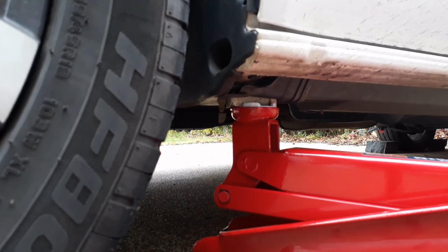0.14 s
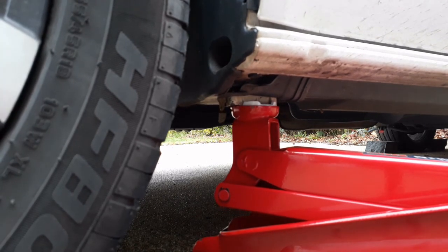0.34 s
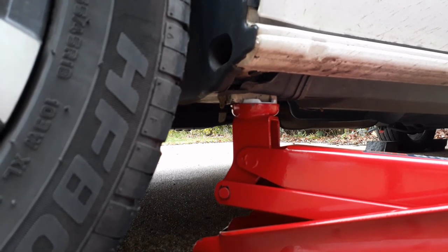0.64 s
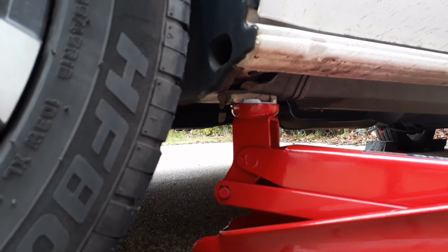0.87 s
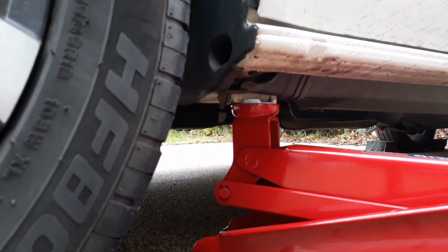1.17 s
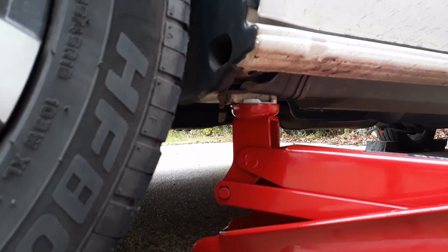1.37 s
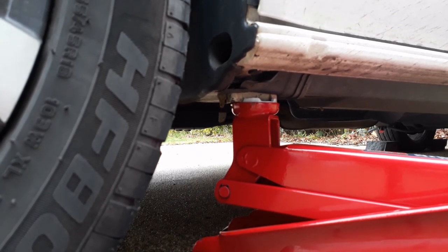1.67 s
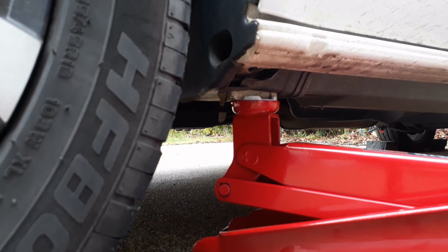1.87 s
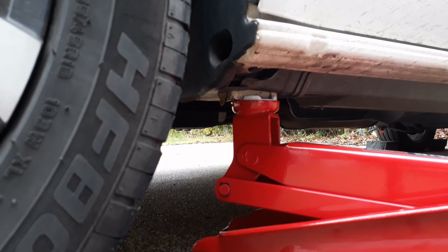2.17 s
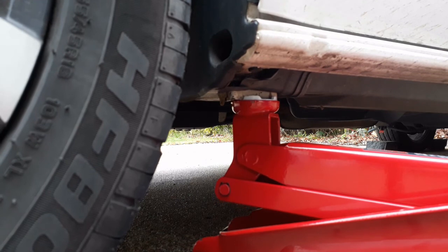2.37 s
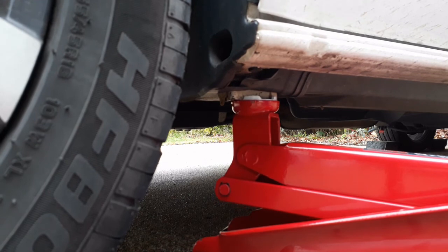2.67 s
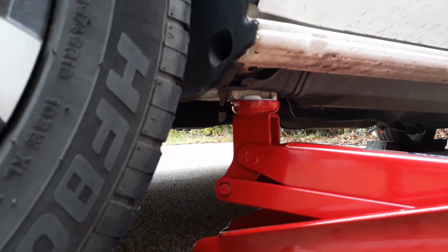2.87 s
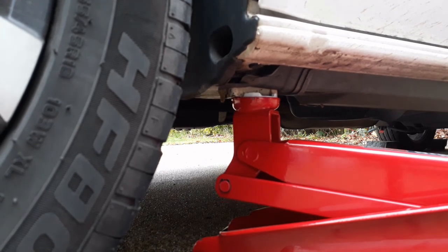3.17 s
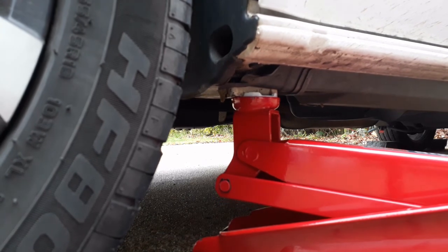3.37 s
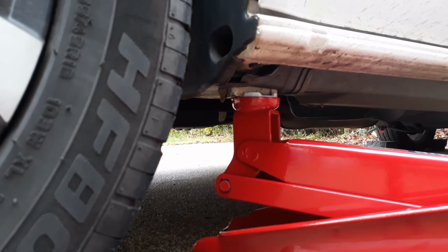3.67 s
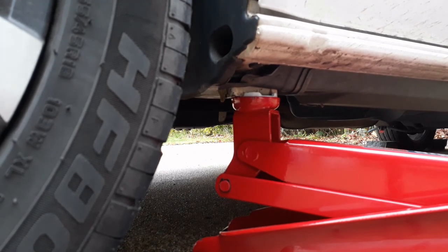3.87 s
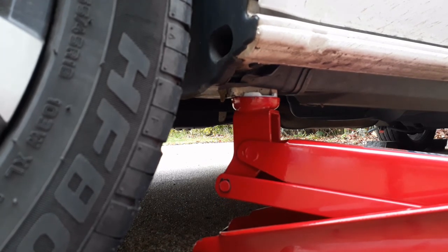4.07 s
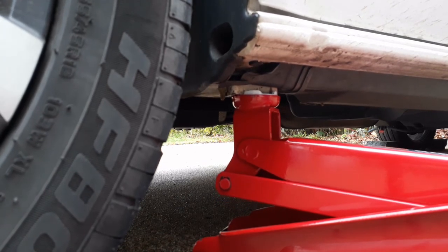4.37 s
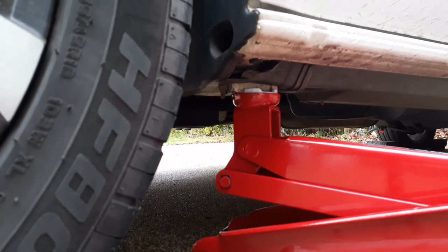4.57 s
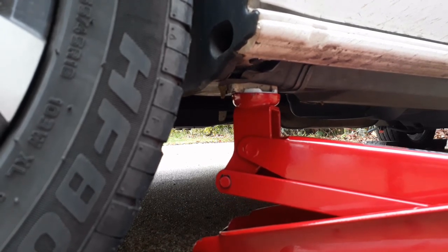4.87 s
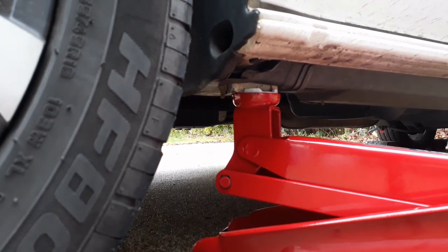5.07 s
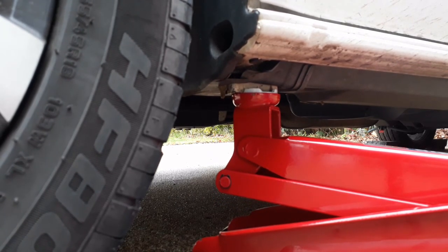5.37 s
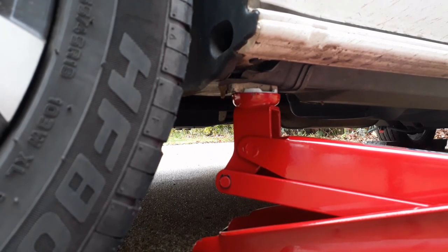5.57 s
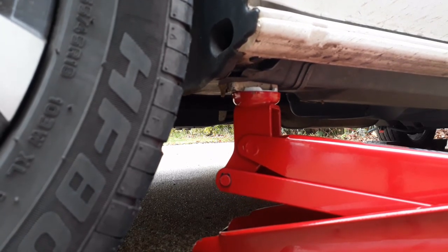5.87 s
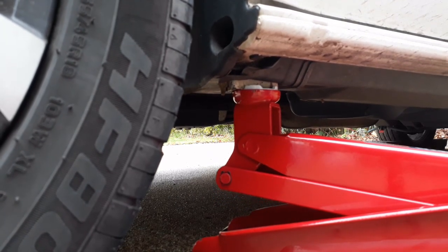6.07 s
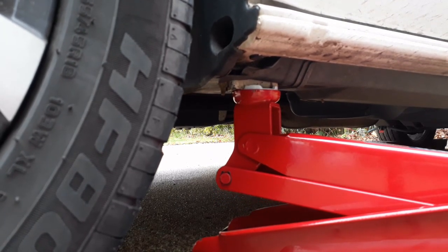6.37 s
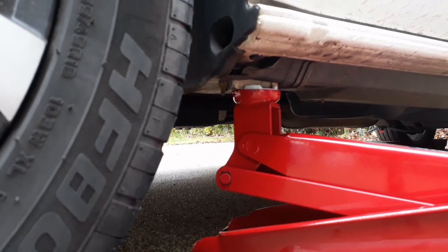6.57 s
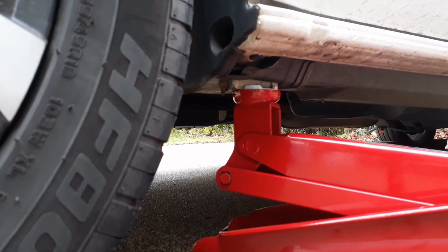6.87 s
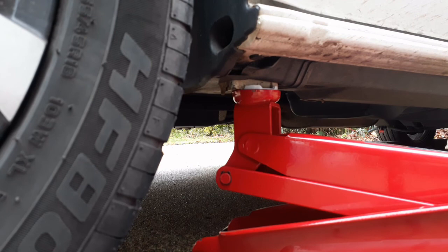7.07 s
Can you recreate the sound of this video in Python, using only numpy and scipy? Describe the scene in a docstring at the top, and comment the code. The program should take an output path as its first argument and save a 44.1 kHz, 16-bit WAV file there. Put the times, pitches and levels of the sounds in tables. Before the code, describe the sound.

A close stereo microphone near the ground picks up a metal car jack working. Loud bright clacks and weighty clunks come about every one and a third seconds, five in all. Between them are dull knocks, dry scrapes, faint squeaks of the piston seal and a low metallic hum. The car's underside adds a faint short tail; the outdoor surroundings are nearly silent, with light wind buffeting the microphone.

```python
"""Floor jack under a car, close

Outdoors, close by: a camera on the ground hears a steel floor jack pumped five times under a car.
Struck modes make the linkage knocks and frame ring; noise bursts make the handle's clicks and clunks.
Swelling noise is the piston's rub and the pivots' scrapes; lumpy noise is light wind on the microphone ports.
The car's underside returns a faint tail, over still outdoor air."""
import sys
import numpy as np
from scipy import signal
from scipy.fft import rfft, irfft, next_fast_len
from scipy.io import wavfile
from scipy.ndimage import uniform_filter1d, map_coordinates

SR = 44100
rng = np.random.default_rng(int(sys.argv[2]) if len(sys.argv) > 2 else 0)


def master_out(mix):
    """Clip the mix to full scale and print it as 16-bit PCM to the path in sys.argv[1]."""
    frames = np.transpose(np.atleast_2d(mix))
    ceiling = np.clip(frames, -1, 1)
    pcm = np.round(ceiling * 32767).astype(np.int16)
    wavfile.write(sys.argv[1], SR, pcm)


N = 318402
TIME = np.arange(N) / SR  # s

# Event levels are relative: each source adds its own trims.
# gusts at the ports: start_s (centre), level_db, half_length_s, left_minus_right_db
GUSTS = [(0.003, -50.5, 0.25, 6.5), (0.776, -66, 1, 5), (1.5, -61, 0.29, 9.5), (6.912, -48, 0.42, -3)]
# eddies hitting the right port: start_s (centre), level_db, pitch_hz
EDDIES = [(6.749, -30, 119), (7.048, -17.5, 123)]
# each shake sets the arm's hum anew: start_s, lower_mode_db, upper_mode_db
SHAKES = [(0, -53.5, -65), (0.93, -62.5, -65), (1.43, -65, -66.5), (2.23, -56, -65), (2.74, -60, -55),
          (3.808, -50.5, -57), (4.05, -51.5, -57.5), (4.93, -59, -61), (5.46, -59, -59), (6.44, -55.5, -75),
          (6.97, -41.5, -66)]
# humming modes of the lifting arm: pitch_hz, t60_s, waver_db
ARM_MODES = [(322.8, 1.65, 3), (403, 1.74, 3.5)]
# dull booms at the arm's lowest mode: start_s, level_db
BOOMS = [(3.809, -54.5), (5.457, -53.5), (6.712, -39), (6.969, -40.5)]
# the steel sings faintly after the first two landings: start_s, level_db
SINGS = [(1.426, -71), (2.733, -69)]
# modes of that singing: pitch_hz, level_db, t60_s
SINGING_MODES = [(810, 2, 1.2), (845, 2, 1.26), (1490, -4, 1.45), (2164, -6, 0.7)]
# the piston is pushed home: start_s (fastest point), level_db
STROKES = [(0.22, -65.5), (1.33, -69), (2.46, -69.5), (3.95, -68.5), (6.86, -69)]
# faint squeaks of the piston seal: start_s (centre), level_db, half_length_s, pitch_hz
SQUEAKS = [(0.851, -64, 0.045, 2160), (0.875, -57.5, 0.061, 2800), (1.965, -77.5, 0.2, 3070),
           (2.208, -62, 0.017, 1625), (2.392, -58, 0.017, 1380), (3.788, -61.5, 0.018, 1360),
           (6.335, -63, 0.032, 3030)]
# hollow knocks as the stroke turns: start_s, level_db, upper_modes_db
KNOCKS = [(0.615, -41, -8), (0.761, -49.5, -28), (2.048, -47, -24), (2.475, -48.5, -44),
          (3.295, -47.5, -12.5), (3.365, -46, -39), (4.618, -43.5, -7.5), (4.799, -53.5, -35),
          (6.223, -56.5, -18)]
# modes of the linkage: pitch_hz, level_db, t60_s
LINKAGE_MODES = [(468.4, 0, 0.13), (513, 0, 0.14), (560, -3.5, 0.25), (656, 15, 0.045), (1059, 16, 0.078),
                 (1160, 24.5, 0.028), (1520, -1.5, 0.14), (1655, 3.5, 0.12), (2400, 3, 0.06)]
# the frame takes up the load: start_s, clatter_db, thump_db
THUDS = [(0.8085, -44.5, -67), (0.9329, -65, -55.5), (1.193, -39.5, -46.5), (2.1187, -44.5, -64.5),
         (2.654, -34.5, -42.5), (3.805, -43, -45), (6.7035, -39.5, -50.5)]
# short scrapes of the pivots: start_s, scrape_db, thump_db, strongest_resonance_hz
SCRAPES = [(0.9078, -41, -51, 4080), (1.117, -52.5, -78, 6700), (2.2233, -41.5, -53.5, 3560),
           (2.404, -50, -78, 7300), (3.543, -47.5, -54, 2190), (3.709, -47, -61.5, 4440),
           (4.922, -50.5, -55, 7700), (5.1025, -54.5, -72, 6400), (6.4172, -48, -61, 5800),
           (6.4373, -42.5, -58, 4620), (6.6305, -54, -95, 6740)]
# the handle clicks in its socket: start_s, clatter_db, tick_db, strongest_resonance_hz
CLICKS = [(1.2583, -40.5, -56, 3370), (1.2751, -30, -36.5, 3030), (1.304, -34.5, -45, 2200),
          (1.351, -37, -54, 3070), (1.3696, -35, -26.5, 4360), (1.3747, -18, -45, 3870),
          (2.364, -31.5, -54, 1930), (2.575, -35, -37.5, 2020), (2.604, -36.5, -62, 2290),
          (2.633, -34.5, -60, 2400), (2.6482, -30, -49, 1860), (2.6678, -23.5, -27.5, 2100),
          (3.963, -44, -75, 3400), (3.9841, -28, -31.5, 3670), (5.294, -37.5, -40, 4640),
          (5.333, -27, -38, 3340), (5.39, -27, -32, 5900), (6.7966, -30.5, -33, 3010),
          (6.8239, -33, -49, 2500), (6.872, -33, -52, 3870), (6.8917, -24.5, -25, 3380),
          (6.902, -23.5, -53, 2030)]
# the handle lands on its stop, then rebounds and seats with its whole weight:
# start_s, clatter_db, tick_db, thump_db, strongest_resonance_hz
LANDINGS = [(1.4168, -29.5, -40, -44.5, 5070), (1.4258, -25, -62, -38, 1454),
            (2.6825, -34, -60, -40.5, 1910), (2.696, -32.5, -68, -37.5, 1680),
            (2.732, -23.5, -44, -38.5, 2270), (2.742, -38, -62, -33, 1290), (4.03, -23.5, -50, -43.5, 2740),
            (4.046, -28, -55, -32, 4700), (5.45, -27, -35, -41, 4960), (5.4618, -22.5, -49, -36.5, 2180),
            (6.9516, -25, -62, -41.5, 2600), (6.974, -33.5, -69, -33, 1510)]
# dry snaps of the saddle under the car: start_s, level_db
SNAPS = [(1.7613, -46), (6.5384, -53.5)]

# modes of the frame and lifting arm: pitch_hz, level_db, t60_s
FRAME_MODES = [(341, 7, 0.12), (367.8, 3, 0.17), (436.2, 0.5, 0.23), (475, 4.5, 0.16), (691.6, 2, 0.14),
               (846, -2.5, 0.15), (1124, -2.5, 0.16), (1448, 11, 0.05), (1583, -5, 0.16)]
# resonances of the handle: pitch_hz, width_hz, level_db
HANDLE_PEAKS = [(2080, 21, 10), (3650, 20, 23), (4150, 165, 19), (4700, 200, 14), (5920, 110, 15),
                (6990, 64, 17.5), (7640, 166, 23), (10490, 130, 17.5), (10800, 86, 8.5)]

# spectra of the noises: pitch_hz, level_db (per Hz)
WIND_COLOUR = [(20, -42), (55, 0), (120, 1.5), (260, -9.5), (400, -14.5), (900, -26), (3000, -41.5)]
AIR_COLOUR = [(20, -15), (60, 0), (120, 5), (220, -11), (380, -0.5), (600, -10.5), (1300, -12.5),
              (6000, -28), (8600, -24), (12500, -20.5), (16000, -22)]
RUB_COLOUR = [(600, 6), (1500, 6), (4000, 8), (7000, 7), (9000, -6), (11500, 4.5), (16000, -35)]
SEAL_COLOUR = [(1200, -13.5), (2200, -13), (3300, -24), (5000, -22.5)]
THUD_COLOUR = [(500, 1), (900, 14.5), (2200, 8), (4500, -14), (12000, -75)]
THUMP_COLOUR = [(40, -27), (150, 3.5), (240, -12.5), (340, 6.5), (490, 8.5), (650, -4), (1400, -32.5)]
TICK_COLOUR = [(5000, -8), (7800, -2.5), (10500, 12.5), (16000, -3)]
SCRAPE_COLOUR = [(500, 9), (900, 17.5), (1700, 11), (4200, 3.5), (7000, 2.5), (12000, -32)]
CLICK_COLOUR = [(500, -35), (1000, 6.5), (1600, 4.5), (3500, 7), (5500, 6.5), (7500, -0.5), (12000, -38)]
CLUNK_COLOUR = [(500, -4.5), (950, 6), (1600, 5), (2600, 0), (4200, -3.5), (6500, -6.5), (12000, -60)]
SNAP_COLOUR = [(1500, -16), (3300, 1), (7500, -7), (10000, -24)]

# left-right likeness of the noises: pitch_hz, likeness (0-1)
LIKENESS = [(100, .7), (400, .85), (1500, .55), (5000, .55), (8000, .8)]
# decay of the tail from the underside and surroundings: pitch_hz, t60_s
UNDERSIDE_DECAY = [(150, 0.67), (500, 0.75), (2000, 0.37), (6000, 0.41), (14000, 0.2)]

CALM_DB = -97  # the breeze between gusts
BOOM_HZ, BOOM_T60_S = 169.1, 0.52
PUSH_DB_PER_S, EASE_DB_PER_S, REST_RUB_DB = 7.5, 36, -75  # the rub swells, dies away, never quite stops
SQUEAK_WIDTH_HZ, SQUEAK_PEAK_DB = 220, 19
BREAKAWAY_DB = -5.5  # hiss that comes with each squeak, relative to it
REBOUND_S, REBOUND_DB, REBOUND_BRIGHT_DB = 0.04, -21, -4  # a softer, duller knock follows each knock
THUD_TICK_DB, THUD_HZ = -44, 1950  # tick relative to the clatter; strongest resonance
SCRAPE_WIDTH_HZ, SCRAPE_PEAK_DB = 760, 17  # how far the strongest resonance stands out
SCRAPE_HISS_DB = -66.5  # fine hiss with every scrape
LEAD_IN_S, LEAD_IN_DB = 0.013, -24.5  # soft noise ahead of each click and landing, under its clatter
FIRM_DB, HEAVIEST_DB, SLACK_DB_PER_S = -10.5, -36, 61  # click thump: under clatter, cap, loss by slack left
PING_DB, PING_T60_S = -16, 0.07  # each contact rings its own resonance
PLATE_SCATTER_DB = 3.5
CHATTER_DB, CHATTER_PER_S = 3, 600  # depth and pace of the chatter within a blow
TOP_HZ = 16100


def amp(db):
    """Decibels to gain."""
    return 10 ** (np.asarray(db) / 20)


def unit(x):
    """Scale to rms 1."""
    return x / np.sqrt(np.mean(x ** 2) + 1e-20)


def along(points, hz):
    """Read (pitch_hz, value) points on a log frequency axis."""
    f, value = np.transpose(points)
    return np.interp(np.log(hz + 1), np.log(f + 1), value)


def wobble(rate):
    """A smooth random curve with rate knots a second."""
    knots = rng.standard_normal(int(N * rate / SR) + 4)
    return map_coordinates(knots, [TIME * rate])


def swell(s, half):
    """A bell-shaped rise and fall around time s."""
    return np.exp(-((TIME - s) / half) ** 2)


def filtered(x, response):
    """Shape x by a response of frequency."""
    n = x.shape[-1]
    m = next_fast_len(n + 8192)
    return irfft(rfft(x, m) * response(np.fft.rfftfreq(m, 1 / SR)), m)[..., :n]


def add(track, s, sound):
    """Mix a stereo sound into the track at time s."""
    part = track[:, max(round(s * SR), 0):][:, :sound.shape[-1]]
    part += sound[..., :part.shape[-1]]


def noise(colour, size, peaks=()):
    """Stereo noise of rms 1 with a spectrum and resonances, less alike in the middle range."""
    def response(hz):
        resonances = sum(amp(db) ** 2 / (1 + (2 * (hz - f) / w) ** 2) for f, w, db in peaks)
        gain = amp(along(colour, hz)) * np.sqrt(1 + resonances)
        turn = np.arccos(np.clip(along(LIKENESS, hz), -1, 1)) / 2
        return gain * np.array([np.cos(turn), np.sin(turn)])  # shares of mid and side
    mid, side = filtered(rng.standard_normal((2, size)), response)
    return unit(np.array([mid + side, mid - side]))


def burst(colour, rise, t60, peaks=(), crack=0, patchy_db=5):
    """Crowded modes swell and die together, led by a brief crack; each contact favours other modes."""
    t = np.arange(SR // 3) / SR
    decay = amp(-60 * t / t60) + crack * amp(-60 * t / 0.024)
    shape = (1 - np.exp(-(t / rise) ** 2)) * decay
    shape /= shape.max()
    knots = np.arange(0, SR / 2, 230)  # Hz
    favour = patchy_db * np.clip(rng.standard_normal(len(knots)), -2, 1.5)
    modes = filtered(noise(colour, len(t), peaks), lambda hz: amp(np.interp(hz, knots, favour)))
    top = filtered(modes, lambda hz: 1 - 1 / (1 + (hz / 6500) ** 6))
    damped = modes - top * (1 - amp(-60 * t / 0.17))  # the highest modes die first
    return unit(damped * shape) * np.sqrt(np.mean(shape ** 2))


def ring(modes, rise, scatter_db):
    """Separate modes, struck with new strengths and phases, decay as sines."""
    t = np.arange(SR * 3 // 2) / SR
    out = np.zeros((2, len(t)))
    for hz, db, t60 in modes:
        u = t[:int(t60 * SR)]
        spread = rng.standard_normal((2, 1)) * min(hz / 1500, 1)  # the ports differ more at high pitch
        phase = rng.uniform(0, 2 * np.pi) + spread
        level = amp(db + scatter_db * rng.standard_normal() - 60 * u / t60)
        out[:, :len(u)] += level * np.sin(2 * np.pi * hz * u + phase)
    return out * (1 - np.exp(-(t / rise) ** 2))


def chatter(x):
    """Loose steel touches many times within one blow, breaking its decay into uneven ticks."""
    knots = np.arange(x.shape[-1]) * CHATTER_PER_S / SR
    count = int(knots[-1]) + 2
    touches = rng.exponential(size=count).clip(0, np.pi)
    gain = amp(CHATTER_DB * np.interp(knots, np.arange(count), touches))
    return x * unit(gain)


def blows(rows, plates, colour, rise, t60, tick_t60, crack, clatter_db, plates_db, tick_db,
          thump_db, frame_db, favour_db, reach=10, tick_peaks=()):
    """Steel meets steel: the handle clatters at once, the heavy frame answers more slowly."""
    out = np.zeros((2, N))
    for s, clatter, tick, thump, hz in rows:
        favoured = (hz, 0.52 * hz, favour_db)  # the point of contact brings out one resonance
        clash = chatter(burst(colour, rise, t60, [*HANDLE_PEAKS, favoured], crack))
        # little is stirred far above that resonance
        clash = filtered(clash, lambda f: 1 / np.sqrt(1 + (f / (reach * hz)) ** 4))
        ping = ring([(hz, 0, PING_T60_S)], rise=0.00054, scatter_db=2)
        plate_ring = ring(plates, rise=0.0026, scatter_db=PLATE_SCATTER_DB)
        high_tick = burst(TICK_COLOUR, rise, tick_t60, tick_peaks, crack)
        low_thump = burst(THUMP_COLOUR, rise=0.0022, t60=0.28)
        frame_ring = ring(FRAME_MODES, rise=0.013, scatter_db=2)
        add(out, s, amp(clatter + clatter_db) * clash)
        add(out, s, amp(clatter + PING_DB) * ping)
        add(out, s, amp(clatter + plates_db) * plate_ring)
        add(out, s, amp(tick + tick_db) * high_tick)
        add(out, s, amp(thump + thump_db) * low_thump)
        add(out, s, amp(thump + frame_db) * frame_ring)
    return out


def side_plates(count):
    """The side plates' many short partials, one set for all blows: pitch_hz, level_db, t60_s."""
    hz = np.linspace(1300, 6300, count) + rng.uniform(-62.5, 38.0, count)
    level_db = -4 * np.log2(hz / hz[0])
    return np.column_stack([hz, level_db, rng.uniform(.06, .19, count)])


def outdoor_air():
    """Still outdoor air: steady coloured noise whose level drifts slowly."""
    return amp(-70.0 + wobble(2.76)) * noise(AIR_COLOUR, size=N)


def wind():
    """Gusts of lumpy buffeting, different at each microphone port, with single eddies at the right."""
    lumps = amp(5 * np.array([wobble(24), wobble(24)]))
    buffets = lumps * rng.standard_normal((2, N))
    low_cut = lambda hz: 1 / (1 + (42 / (hz + 1)) ** 4)
    rumble = unit(filtered(buffets, lambda hz: amp(along(WIND_COLOUR, hz)) * low_cut(hz)))
    gusts = sum(amp([[db + pan / 2], [db - pan / 2]]) * swell(s, half) for s, db, half, pan in GUSTS)
    out = rumble * (amp(CALM_DB) + gusts)
    for s, db, hz in EDDIES:
        cycles = (TIME - s) * hz
        out[1] += amp(db) * np.sin(2 * np.pi * cycles) * np.exp(-(cycles / .8) ** 2)
    return out


def arm():
    """The arm's modes hum on from each shake; heavy blows add a low boom or a thin singing."""
    starts, *levels = np.transpose(SHAKES)
    last = np.maximum(np.searchsorted(starts, TIME) - 1, 0)  # the latest shake
    since = TIME - starts[last]
    out = np.zeros((2, N))
    for (hz, t60, waver_db), db in zip(ARM_MODES, levels):
        level = amp(db[last] - 60 * since / t60 + waver_db * wobble(20))
        smooth_level = uniform_filter1d(level, size=SR // 50)
        out += smooth_level * np.sin(2 * np.pi * hz * TIME + 0.53 * wobble(8.2))
    for s, db in BOOMS:
        add(out, s, amp(db) * ring([(BOOM_HZ, 0, BOOM_T60_S)], rise=0.01, scatter_db=1))
    for s, db in SINGS:
        add(out, s, amp(db) * ring(SINGING_MODES, rise=0.0089, scatter_db=6))
    return out


def piston():
    """A hiss that swells with each push and the seal's gritty squeak, both roughened by tiny slips."""
    slips = amp(1.1 * wobble(63) + wobble(570))
    pushes = [amp(db - np.maximum(PUSH_DB_PER_S * (s - TIME), EASE_DB_PER_S * (TIME - s)))
              for s, db in STROKES]
    rub = np.maximum(np.max(pushes, axis=0), amp(REST_RUB_DB))
    squeak = np.zeros((2, N))
    for s, db, half, hz in SQUEAKS:
        level = amp(db) * swell(s, half)
        rub += amp(BREAKAWAY_DB) * level
        grit = np.zeros((2, N))
        # one second of noise, centred on the squeak
        add(grit, s - .5, noise(SEAL_COLOUR, size=SR, peaks=[(hz, SQUEAK_WIDTH_HZ, SQUEAK_PEAK_DB)]))
        squeak += level * grit
    return slips * (rub * noise(RUB_COLOUR, size=N) + slips * squeak)


def linkage():
    """Hollow knocks and rebounds, each with its own share of upper modes; dull ones keep mostly the lowest."""
    out = np.zeros((2, N))
    rebounds = [(s + REBOUND_S, db + REBOUND_DB, bright_db + REBOUND_BRIGHT_DB)
                for s, db, bright_db in KNOCKS]
    lowest_hz = LINKAGE_MODES[0][0]
    for s, db, bright_db in KNOCKS + rebounds:
        modes = [(hz, level + bright_db * min(np.log2(hz / lowest_hz) * 2, 1.4), t60)
                 for hz, level, t60 in LINKAGE_MODES]
        add(out, s, amp(db) * ring(modes, rise=0.009, scatter_db=1.0))
        add(out, s, amp(db + bright_db - 5) * burst(THUD_COLOUR, rise=0.0042, t60=0.17))
        add(out, s, amp(db - 13) * burst(THUMP_COLOUR, rise=0.00045, t60=0.53))
    return out


def load_thuds(plates):
    """The frame takes up the load in softer blows that share one dull resonance."""
    rows = [(s, db, db + THUD_TICK_DB, thump, THUD_HZ) for s, db, thump in THUDS]
    return blows(rows, plates, THUD_COLOUR, rise=0.001, t60=0.25, tick_t60=0.15, crack=0.14,
                 clatter_db=-11.0, plates_db=-22.0, tick_db=-12, thump_db=0.5, frame_db=-2, favour_db=4)


def pivots():
    """Each scrape is a chattering, resonant burst with a fine hiss, and shakes the frame."""
    out = np.zeros((2, N))
    for s, scrape_db, thump_db, hz in SCRAPES:
        peaks = [*HANDLE_PEAKS, (hz, SCRAPE_WIDTH_HZ, SCRAPE_PEAK_DB)]
        scrape = chatter(burst(SCRAPE_COLOUR, rise=0.00064, t60=0.2, peaks=peaks))
        add(out, s, amp(scrape_db - 2.5) * scrape)
        add(out, s, amp(SCRAPE_HISS_DB) * burst(TICK_COLOUR, rise=0.0014, t60=0.59))
        add(out, s, amp(thump_db) * ring(FRAME_MODES, rise=0.017, scatter_db=6))
    return out


def lead_ins():
    """A faint soft noise swells just before each click and landing."""
    out = np.zeros((2, N))
    for s, db, *_ in [*CLICKS, *LANDINGS]:
        soft_noise = burst(SCRAPE_COLOUR, rise=0.015, t60=0.1, peaks=HANDLE_PEAKS)
        add(out, s - LEAD_IN_S, amp(db + LEAD_IN_DB) * soft_noise)
    return out


def handle_clicks(plates):
    """Sharp clicks in the handle's slack, thumping harder as the slack runs out."""
    rows = []
    for s, db, tick, hz in CLICKS:
        to_stop = min(stop - s for stop, *_ in LANDINGS if stop > s)  # s
        thump = min(db + FIRM_DB, HEAVIEST_DB) - SLACK_DB_PER_S * to_stop
        rows.append((s, db, tick, thump, hz))
    return blows(rows, plates, CLICK_COLOUR, rise=0.00088, t60=0.12, tick_t60=0.21, crack=5.7,
                 clatter_db=-9, plates_db=-24.0, tick_db=-5.0, thump_db=-15.0, frame_db=-6.5,
                 favour_db=13, reach=2.7, tick_peaks=HANDLE_PEAKS)


def handle_landings(plates):
    """The handle hits its stop and seats: heavy clunks that leave the frame ringing."""
    return blows(LANDINGS, plates, CLUNK_COLOUR, rise=0.00079, t60=0.098, tick_t60=0.28, crack=0.78,
                 clatter_db=-5.5, plates_db=-27.5, tick_db=-13, thump_db=-6.0, frame_db=-6.5,
                 favour_db=12.5, reach=2.56)


def saddle():
    """Short, dry snaps under the car that leave nothing ringing."""
    out = np.zeros((2, N))
    for s, db in SNAPS:
        add(out, s, amp(db) * burst(SNAP_COLOUR, rise=0.0016, t60=0.038))
    return out


def from_right(x):
    """The middle range reaches the left port late; bass and top treble stay in phase."""
    turns = lambda hz: np.interp(hz, [500, 900, 5500], [0, .33, 2])  # half-turns of phase per port
    return filtered(x, lambda hz: np.exp(1j * np.pi * turns(hz) * np.array([[-1], [1]])))


def underside(x):
    """The car's underside and the surroundings return a tail of decaying noise."""
    hz, t, z = signal.stft(rng.standard_normal((2, SR // 2)), SR, nperseg=256)
    decay = amp(-60 * t / along(UNDERSIDE_DECAY, hz)[:, None])
    tail = signal.istft(z * decay, SR, nperseg=256)[1]
    return signal.fftconvolve(x, tail / np.linalg.norm(tail[0]), axes=1)[:, :N]


def scene():
    """The jack, its faint echo, the wind and still outdoor air."""
    plates = side_plates(count=48)
    handle = lead_ins() + handle_clicks(plates) + handle_landings(plates)
    jack = from_right(piston() + linkage() + load_thuds(plates) + pivots() + handle + saddle())
    echo = amp(-16.5) * underside(jack)
    return outdoor_air() + wind() + arm() + jack + echo


def record(dry):
    """The camera keeps nothing above its band limit."""
    return filtered(dry, lambda hz: hz < TOP_HZ)


dry = scene()
out = record(dry)
master_out(out)
```